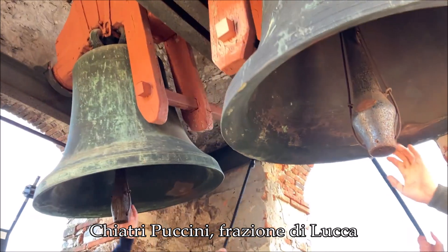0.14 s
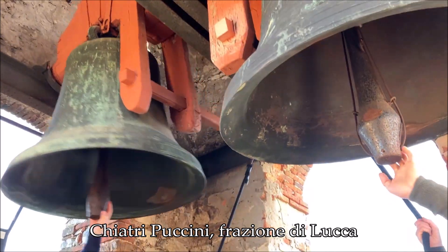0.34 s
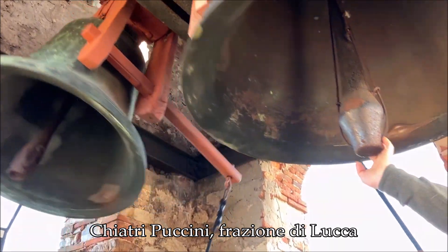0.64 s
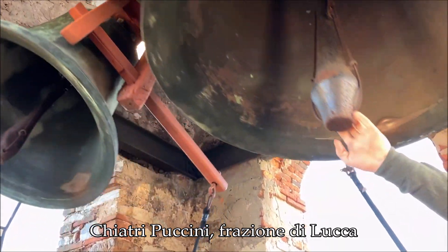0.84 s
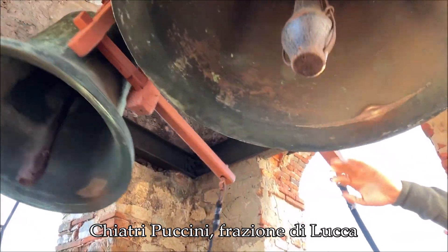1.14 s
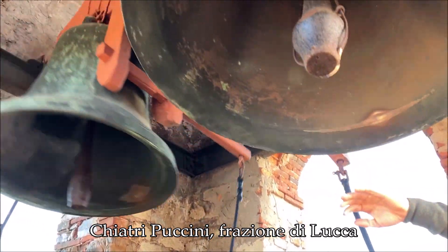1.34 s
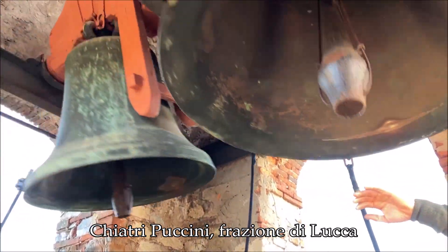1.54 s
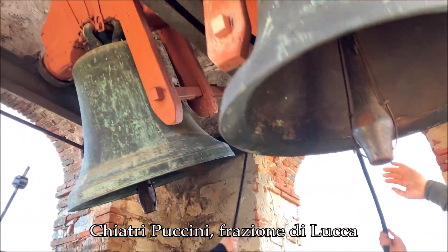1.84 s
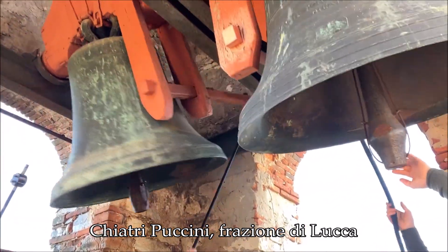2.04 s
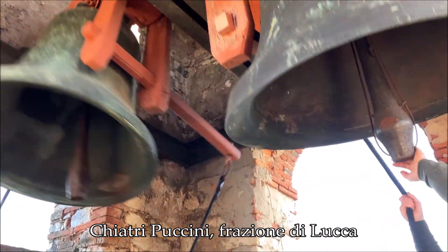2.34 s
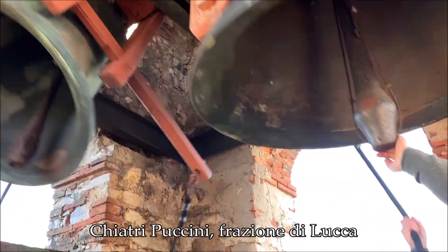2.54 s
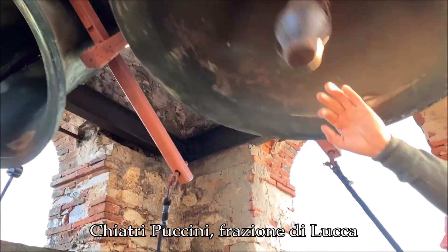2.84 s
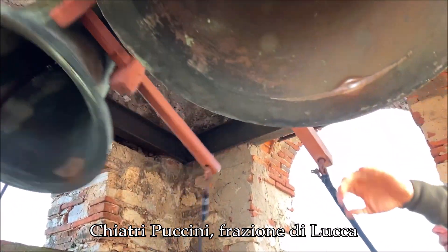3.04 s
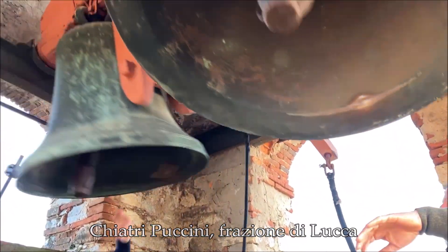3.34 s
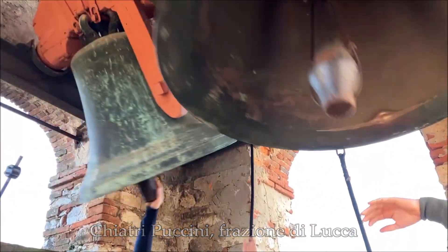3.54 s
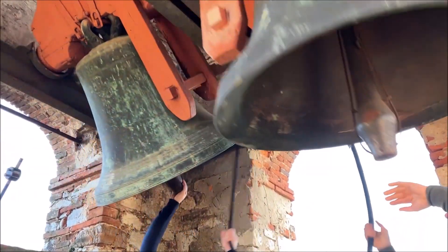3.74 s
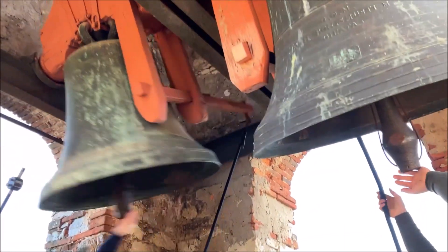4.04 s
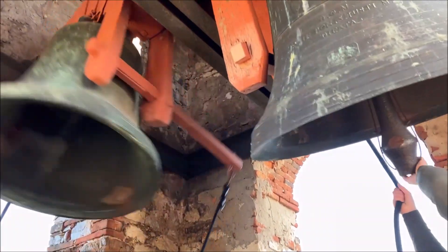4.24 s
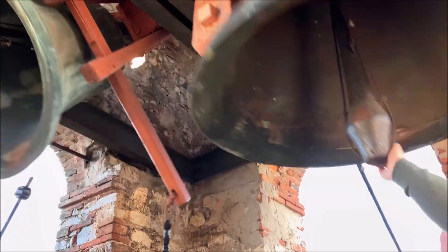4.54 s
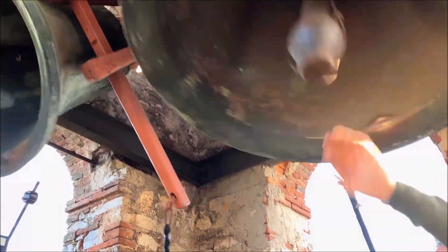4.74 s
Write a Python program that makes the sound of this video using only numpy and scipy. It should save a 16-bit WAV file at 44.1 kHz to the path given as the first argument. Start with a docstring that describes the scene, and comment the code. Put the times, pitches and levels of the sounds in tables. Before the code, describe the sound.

Heavy bells swing by hand in an open brick belfry, but no clapper strikes; only their mountings sound. Faint iron ticks and short low timber groans open the first 0.4 s, then firmer wooden knocks at 0.5-0.6 s. A hard, bright iron crack lands at 0.84 s, the sharpest blow. Sparse clacks follow at 1.25 and 1.9 s. From 2.2 to 2.5 s knocks cluster with groaning wood, a strong clack at 2.4 s and dull thuds. Around 3 s it is quieter, with a very faint bearing creak. A short high squeak comes at 3.4 s, then low frame thuds near 3.6 s. Rattling thickens from 3.7 to 4.3 s with creaks and thuds, then thins to small knocks, a groan and a last thud near 4.8 s. Blows leave a barely audible bronze hum and short reflections. Soft rustle, low wind bumps and faint outdoor murmur continue beneath, in close stereo.

```python
"""Headstock timbers and iron fittings knock and rattle close by, as heavy bells are set swinging by hand in an
open brick belfry, clappers held silent: chattering impacts ring iron, timber and bronze modes.
Timber groans, a bearing creaks and high squeaks sound by stick-slip; decaying sines thud in the frame.
Shaped noise makes a background rustle, the hiss of contact at each hard blow,
a light wind that bumps the microphone, and the murmur of the open air."""
import sys
import numpy as np
from scipy import signal
from scipy.fft import rfft, irfft, next_fast_len
from scipy.io import wavfile
from scipy.ndimage import uniform_filter1d

SR = 44100
rng = np.random.default_rng(int(sys.argv[2]) if len(sys.argv) > 2 else 0)


def gain_from_db(level_db):
    """Convert decibel levels to linear amplitude factors (20 dB per decade)."""
    decades = np.asarray(level_db, float) / 20
    return 10 ** decades


def int16_out(signal):
    """Quantize to a 16-bit WAV file."""
    q = np.round(np.clip(np.atleast_2d(signal).T, -1, 1) * 32767)
    wavfile.write(sys.argv[1], SR, q.astype(np.int16))


N = 215119

# Knocks of the fittings. Each row: time in seconds, iron level in dB before the gain for a long chatter,
# timber over iron in dB, hardness as the pitch in Hz where the treble starts to fall,
# chatter in seconds (held to 0.05), boost of the iron strap's ring in dB.
KNOCKS = [(.081, -50.5, -23, 1480, 0.045, -2), (.118, -43.5, -0.5, 6160, 0.019, 17),
          (0.194, -50.5, 0, 7060, 0.015, 21), (.274, -55, 11.5, 910, 0.0079, 10),
          (.49, -36, 4, 3870, 0.0097, 10), (.52, -50, 4.5, 2070, 0.031, -5),
          (.579, -34, 2.5, 2900, 0.0096, -4), (.609, -44, 2, 2530, .021, 23),
          (.76, -49, -0.5, 8400, 0.0057, -10), (.841, -19, -18, 8000, 0.024, -11),
          (.898, -36.5, -12.5, 6460, 0.014, 1), (1.17, -46.5, -6.5, 2020, 0.016, 3),
          (1.251, -31.5, -11, 4170, 0.02, 5.5), (1.291, -50.5, -20, 4970, .028, -9),
          (1.348, -47, -23, 8900, 0.018, -11), (1.551, -55.5, 6, 7000, 0.012, -11),
          (1.874, -39.5, -3, 2920, 0.012, 16), (2.17, -40.5, .5, 1150, 0.0094, 34),
          (2.242, -30, -12, 4500, 0.0074, 23.5), (2.27, -47, 10, 1170, 0.036, 21),
          (2.4, -23, 3, 5100, 0.0045, -18), (2.439, -46, 12, 2520, 0.012, 19),
          (2.482, -43, 6, 4960, 0.015, 9), (3.087, -47, 5.5, 7000, 0.0069, -4),
          (3.148, -56, 7.5, 2970, 0.0058, 0), (3.392, -43, 1, 7550, 0.02, -1),
          (3.709, -30.5, -13, 4330, 0.011, -11), (3.74, -40.5, -2, 4600, 0.017, 10),
          (3.818, -34, 5, 3020, 0.025, 12), (3.833, -29, 2, 5950, 0.014, 14),
          (3.938, -52, -15, 1490, 0.01, 12), (3.963, -34, -10, 1830, 0.0054, 23),
          (4.1, -39.5, 2.5, 3000, 0.018, 28), (4.168, -29, -9, 6000, 0.0074, 10),
          (4.208, -25, 5, 6130, 0.0091, 12.5), (4.24, -42, 4.5, 4020, 0.01, 14),
          (4.287, -30, 0.5, 6140, 0.0084, 7), (4.503, -49, -14, 7300, 0.021, 6),
          (4.626, -48.5, 0, 1970, 0.061, -7), (4.678, -37, 4, 4200, 0.013, -3),
          (4.704, -48.5, 9.5, 3000, 0.03, 8)]
# Modes of the headstock timber, before detuning. Each row: pitch in Hz, level in dB, 60 dB decay in seconds.
TIMBER = [(104, -12, 0.21), (200, -32, 0.21), (277, 3.5, 0.068), (362.5, 3.5, 0.093), (412.8, 7.5, 0.058),
          (540, -7.5, 0.047), (659, -5, 0.084)]
# Modes of the iron fittings, before detuning. Each row: pitch in Hz, level in dB,
# 60 dB decay in seconds (at least 0.004 is used).
IRON = [(837, -15, 0.064), (1083, -11, 0.04), (1422, -13, 0.046), (1676, 0.5, 0.0052), (1976, 0.5, 0.0098),
        (2330, -13, 0.01), (2633, -7, 0.012), (3303, 1, 0.0033), (4230, 0, 0.0037), (4500, -5, 0.01),
        (5320, -2, 0.011), (6430, 2, 0.0024), (7160, -1.5, 0.0025), (9100, 16.5, 0.0017),
        (11650, 6.5, 0.0052)]
# Faint hum of the bells after a knock. Each row: pitch in Hz, level in dB, 60 dB decay in seconds.
BRONZE = [(985, -33, .4), (1310, -39, .7), (1355, -34, .35), (1530, -38, .5), (1850, -40, .5),
          (2680, -39, .25)]
# Groans of loaded timber. Each row: start in seconds, length in seconds, level in dB,
# resonance at the start in Hz, resonance at the end in Hz.
GROANS = [(0.121, 0.111, -53, 362, 316), (0.271, 0.038, -46.5, 355, 352), (.298, 0.075, -50, 367, 350),
          (2.166, 0.071, -47.5, 350, 376), (2.241, 0.027, -40.5, 440, 410), (2.283, .11, -44.5, 338, 330),
          (2.97, 0.14, -62, 442, 434), (3.036, 0.12, -56.5, 303, 325), (3.845, .07, -40.5, 255, 250),
          (4.21, 0.057, -40.5, 337, 335), (4.697, 0.085, -42, 263, 274), (4.793, 0.12, -60, 293, 290)]
# Creaks of a bearing. Each row: start in seconds, length in seconds, level in dB,
# resonance at the start in Hz, resonance at the end in Hz.
CREAKS = [(2.89, 0.32, -67, 1055, 1190), (3.935, 0.038, -47.5, 787, 782), (3.966, 0.054, -46.5, 793, 800)]
# Squeaks: the bearing creak's high overtone near 2.3 kHz, and a pin's squeak near 5.1 kHz.
# Each row: start in seconds, length in seconds, level in dB,
# resonance at the start in Hz, resonance at the end in Hz.
SQUEAKS = [(2.964, 0.12, -57.5, 2330, 2310), (3.392, 0.084, -44.5, 5100, 5060)]
# Dull thuds through floor and frame. Each row: time in seconds, level in dB, pitch in Hz,
# 60 dB decay in seconds (held to 0.3).
THUDS = [(0.241, -36.5, 53.4, 0.055), (0.538, -43.5, 106, 0.15), (0.661, -44, 192, 0.14),
         (2.268, -44, 107, 0.087), (2.429, -32, 89, 0.089), (2.499, -31.5, 114, 0.073),
         (3.16, -36, 56.6, 0.087), (3.54, -31.5, 119, 0.061), (3.559, -32.5, 115.6, 0.14),
         (3.586, -27.5, 48, 0.21), (3.605, -36, 146, 0.12), (3.641, -39, 109, .12), (3.769, -39, 83, 0.34),
         (3.967, -30, 78, 0.041), (4.04, -36, 46, 0.18), (4.089, -27.5, 78.2, 0.17),
         (4.123, -33, 93, 0.038), (4.163, -34.5, 90, 0.1), (4.767, -33, 88, 0.17)]
# Reverberation of the brick belfry. Each row: pitch in Hz, 60 dB decay in seconds.
BELFRY = [(200, 0.21), (600, 0.34), (1500, 0.32), (4000, 0.21), (10000, 0.23)]
# Background rustle over time. Each row: time in seconds, level in dB.
RUSTLE = [(0.0, -96), (.16, -57.5), (.3, -87), (.46, -69.5), (.75, -78), (1.02, -86), (1.3, -65),
          (1.58, -69), (1.74, -79), (1.82, -70.5), (2.08, -74.5), (2.75, -70.5), (3.4, -73), (3.8, -73.5),
          (4.1, -61.5), (4.38, -82), (4.46, -62), (4.6, -73), (4.68, -63), (4.88, -62)]
# Spectrum of rustle and contact hiss. Each row: pitch in Hz, relative density in dB per Hz.
RUSTLE_COLOUR = [(60, -37), (300, -24), (1000, -5), (2500, 12), (5000, 6), (8000, 7.5), (12000, -1),
                 (22000, -61)]
# Wind on the microphone over time. Each row: time in seconds, level in dB.
WIND = [(0.0, -66), (0.12, -57), (0.5, -68), (0.71, -48.5), (0.8, -60), (1.37, -54), (1.83, -59.5),
        (2.44, -50.5), (2.74, -58.5), (2.97, -54), (3.56, -51.5), (3.69, -49), (3.88, -50.5), (4.09, -43),
        (4.29, -51), (4.62, -45.5), (4.74, -61), (4.88, -43)]
# Spectrum of the wind. Each row: pitch in Hz, relative density in dB per Hz.
WIND_COLOUR = [(15, -68), (30, -18), (50, -2), (90, -1.5), (150, -13.5), (300, -16), (700, -27.5),
               (2000, -64)]
# Spectrum of the open air. Each row: pitch in Hz, relative density in dB per Hz.
AIR_COLOUR = [(20, -36), (60, -33), (100, 8), (300, -11), (1000, -17), (2500, -23.5), (6000, -31),
              (12000, -30), (22000, -101)]
# Stereo likeness by pitch: bass alike, middle apart, treble swinging between in step and opposed.
# Each row: pitch in Hz, likeness from -1 (opposed) to 1 (in step).
STEREO_LIKENESS = [(60, .82), (200, .8), (350, .4), (900, .1), (2000, -.1), (3200, -.2), (4200, .2),
                   (5300, 0), (6300, .4), (6700, .995), (7400, .995), (7900, -.3), (8500, -.9995),
                   (9600, -.9995), (10000, 0), (10400, .998), (22000, .9995)]
# Overall colour: weak deep bass, and a steep edge near 12 kHz. Each row: pitch in Hz, gain in dB.
OVERALL_COLOUR = [(10, -35), (25, -14), (42, -3), (7800, 0.86), (9200, -2), (10600, 0), (11800, 1),
                  (12300, -56), (13000, -19), (22000, -50)]

KNOCK_PAN_DB, KNOCK_PAN_SPREAD_DB = 2.5, 2  # left minus right
STRAP_HZ, STRAP_HZ_PER_OCTAVE = 866, 61.7  # a harder blow rings the strap a little higher
# A blow away from the strap rings a bearing plate: the plate loses this share of the strap's dB.
PLATE_HZ, PLATE_DB, PLATE_TRADE = 2520, 3, 0.5
KNOCK_ECHO_DB, SLIP_ECHO_DB = 1, -2  # slips stir the belfry less than blows do
SLIP_RISE_S, SLIP_WAVER_HZ = 0.0044, 14  # swell; rms wobble of the pitch
BREAK_FREE = 2.6  # size of a fixed early jerk; the spread of the others is 1
# Bright hiss of contact at a blow, the louder the harder it is.
HISS_DB, HISS_DB_PER_OCTAVE, HARD_HZ = -12.5, 20.5, 8000
HISS_RISE_S, HISS_FADE_DB_PER_S = 0.0071, 423
AIR_DB = -59


def evened(x):
    """Scales to rms 1."""
    return x / np.sqrt(np.mean(x ** 2) + 1e-20)


def read(points, hz):
    """Reads a table on a log-frequency axis."""
    f, value = np.transpose(points)
    return np.interp(np.log(hz + 1), np.log(f + 1), value)


def add(mix, s, sound):
    """Mixes a two-channel sound in at time s."""
    part = mix[:, max(round(s * SR), 0):][:, :sound.shape[1]]
    part += sound[:, :part.shape[1]]


def ring(modes, size, spread):
    """Impulse response of an object: decaying sines, each tuned a little differently on every call."""
    hz, db, t60 = np.transpose(modes)
    hz = hz * (1 + spread * rng.standard_normal(len(hz)))
    t = np.arange(size)[:, None] / SR
    decay = gain_from_db(db - 60 * t / np.clip(t60, 0.004, 2))
    return (decay * np.sin(2 * np.pi * hz * t)).sum(1)


def iron_fittings(impacts, bronze, top_hz, strap_db):
    """Tiny impacts ring iron and bronze; strap and plate stand out, and soft contact dulls the treble."""
    body = bronze.copy()
    body[:1024] += ring(IRON, size=1024, spread=0.038)
    body[0] += 7  # the bare crack of contact
    iron = signal.fftconvolve(impacts, body)
    strap_hz = STRAP_HZ + STRAP_HZ_PER_OCTAVE * np.log2(top_hz / 3000)
    iron += gain_from_db(strap_db) * signal.lfilter(*signal.iirpeak(strap_hz, 12, SR), iron)
    plate_hz = PLATE_HZ * (1 + 0.042 * rng.standard_normal())
    plate = signal.lfilter(*signal.iirpeak(plate_hz, 9, SR), iron)
    iron += gain_from_db(PLATE_DB - PLATE_TRADE * strap_db) * plate
    soft = signal.butter(4, top_hz, fs=SR, output="sos")
    iron = signal.sosfilt(soft, iron) + gain_from_db(-28.5) * iron  # a little treble still gets past
    iron = signal.lfilter(*signal.butter(2, 500, "high", fs=SR), iron)
    return iron / np.linalg.norm(iron)


def headstock_timber(push):
    """A slow, uneven push rings the low modes of the timber."""
    timber = signal.fftconvolve(push, ring(TIMBER, size=4096, spread=0.061))
    return timber / np.linalg.norm(timber)


def knock(bronze, iron_db, timber_db, top_hz, chatter_s, strap_db):
    """Loose parts meet in a quick chatter of tiny impacts; iron answers at once, timber takes a slower push."""
    t = np.arange(4096) / SR
    strength, chance, push_strength = rng.standard_normal((3, len(t)))
    pan_db = KNOCK_PAN_DB + KNOCK_PAN_SPREAD_DB * rng.standard_normal()
    chatter_s = np.clip(chatter_s, 0.002, 0.05)
    swell = np.minimum(t / (0.45 * chatter_s), 1) * np.exp(-(t / chatter_s) ** 2)
    impacts = swell * strength * (abs(chance) > 1.15)
    sound = iron_fittings(impacts, bronze, top_hz, strap_db)
    push_shape = np.minimum(t / 0.0096, 1) * np.exp(-t / (chatter_s + 0.022))
    timber = headstock_timber(push_shape * push_strength * (abs(chance) > 2))
    sound[:len(timber)] += gain_from_db(timber_db) * timber
    level = gain_from_db(iron_db) * np.sqrt(chatter_s * SR / 10)  # a longer chatter carries more energy
    return level * belfry(sound, KNOCK_ECHO_DB) * gain_from_db([[pan_db / 2], [-pan_db / 2]])


def resonate(x, hz, width):
    """A moving resonance of gain 1: shift down, smooth, shift back."""
    turn = np.exp(2j * np.pi * np.cumsum(hz) / SR)
    r = np.exp(-np.pi * width / SR)
    return 2 * (turn * signal.lfilter([1 - r], [1, -r], x / turn)).real


def slip(length, level_db, from_hz, to_hz, slips_per_s, width_hz, overtone, overtone_db, loss_db):
    """Uneven stick-slip jerks ring a resonance and a weaker one above it; a quick swell, then a fade."""
    u = np.arange(0, length, 1 / SR) / length
    wobble = evened(uniform_filter1d(rng.standard_normal(len(u)), size=700))
    hz = from_hz + (to_hz - from_hz) * u + SLIP_WAVER_HZ * wobble
    jerks = (rng.random(len(u)) < slips_per_s / SR) * rng.standard_normal(len(u))
    jerks[100] = BREAK_FREE
    low = evened(resonate(resonate(jerks, hz, width_hz), hz, 3 * width_hz))
    high = evened(resonate(jerks, overtone * hz, 2.1 * width_hz))
    swell = np.minimum(u * length / SLIP_RISE_S, 1)
    release = np.minimum((1 - u) * 10, 1)
    shape = swell * gain_from_db(level_db + loss_db * u) * release
    return belfry(shape * (low + gain_from_db(overtone_db) * high), SLIP_ECHO_DB)


def groan(*row):
    """Loaded timber slips unevenly and rings a low, narrow resonance."""
    return slip(*row, slips_per_s=300, width_hz=45, overtone=2.3, overtone_db=-16, loss_db=-10.4)


def creak(*row):
    """A bearing slips as unevenly as the timber, with a broader resonance that fades less."""
    return slip(*row, slips_per_s=300, width_hz=60, overtone=2.05, overtone_db=-20, loss_db=-7.8)


def squeak(*row):
    """A creak's high overtone or a pin's squeak: dense jerks in a broad, high resonance that fades quickly."""
    return slip(*row, slips_per_s=1300, width_hz=130, overtone=2.02, overtone_db=-18, loss_db=-27.3)


def thud(db, hz, t60):
    """A soft low push rocks the frame for a few cycles, with a quicker shudder on top."""
    t = np.arange(SR // 4) / SR
    shudder_hz = hz * rng.uniform(1.46, 2.79)
    shudder = 0.51 * np.sin(2 * np.pi * shudder_hz * t) * gain_from_db(-30 * t / 0.049)
    rock = (np.sin(2 * np.pi * hz * t) + shudder) * np.minimum(t * hz / 0.41, 1)
    return rock * gain_from_db(db - 60 * t / np.clip(t60, 0.02, 0.3)) * np.array([[1], [0.85]])


def belfry(x, echo_db):
    """Direct sound plus sparse reflections off brick and bronze, other ones for each side."""
    at = np.arange(60, SR // 3 - 20, 20)
    at = at + rng.integers(0, 20, (2, len(at)))
    taps = np.zeros((2, SR // 3))
    np.put_along_axis(taps, at, rng.choice([-1.0, 1.0], at.shape), 1)
    hz, t, z = signal.stft(taps, SR, nperseg=256)
    decay = gain_from_db(-60 * t / np.clip(read(BELFRY, hz), 0.05, 2)[:, None])
    tail = signal.istft(z * decay, SR, nperseg=256)[1]
    tail *= gain_from_db(echo_db) / np.linalg.norm(tail[0])
    tail[1, 0] += 1
    tail[0, 4] += 1  # the direct sound reaches the left side a little later
    return signal.fftconvolve(x[None], tail, axes=1)


def hush(colour, size, patchy_db, flicker_db):
    """Random short-time spectra with patches and a flicker across all pitches, unrelated left and right."""
    hop = size // 4
    frames, hz = N // hop + 5, np.fft.rfftfreq(size, 1 / SR)
    draw = rng.standard_normal((5, len(hz), frames))
    patches = uniform_filter1d(draw[4], size // 64, axis=0)  # across pitch
    patches = evened(uniform_filter1d(patches, 6, axis=1))  # across time
    flicker = evened(uniform_filter1d(rng.standard_normal(frames), 3))
    db = read(colour, hz)[:, None] + patchy_db * patches + flicker_db * flicker
    z = (draw[:2] + 1j * draw[2:4]) * gain_from_db(db)
    return evened(signal.istft(z, nperseg=size, noverlap=size - hop)[1][:, :N])


def rustle_and_contact_hiss(t):
    """Bright hiss of contact at each hard blow, over a background rustle: one noise, their powers summed."""
    power = gain_from_db(np.interp(t, *np.transpose(RUSTLE))) ** 2
    for s, iron_db, _, top_hz, _, _ in KNOCKS:
        after = np.clip(t - s, 0, None)
        db = iron_db + HISS_DB + HISS_DB_PER_OCTAVE * np.log2(top_hz / HARD_HZ)
        fade = gain_from_db(db - HISS_FADE_DB_PER_S * np.minimum(after, 0.5))
        power = power + (np.minimum(after / HISS_RISE_S, 1) * fade) ** 2
    return np.sqrt(power) * hush(RUSTLE_COLOUR, size=512, patchy_db=2, flicker_db=2.5)


def wind(t):
    """A light wind bumps the microphone: low noise that swells and sinks."""
    return gain_from_db(np.interp(t, *np.transpose(WIND))) * hush(WIND_COLOUR, size=2048, patchy_db=2.5, flicker_db=1)


def open_air():
    """The murmur of the open air: faint noise, strongest in the bass."""
    return gain_from_db(AIR_DB) * hush(AIR_COLOUR, size=1024, patchy_db=2.0, flicker_db=1.13)


def scene():
    """Knocks, groans, creaks, squeaks and thuds in the belfry, over rustle, wind and open air."""
    t = np.arange(N) / SR
    mix = np.zeros((2, N))
    bronze = ring(BRONZE, size=12289, spread=0)
    for s, *blow in KNOCKS:
        add(mix, s - 0.003, knock(bronze, *blow))  # the chatter begins just ahead of the listed time
    for voice, rows in [(groan, GROANS), (creak, CREAKS), (squeak, SQUEAKS)]:
        for s, *row in rows:
            add(mix, s, voice(*row))
    for s, *push in THUDS:
        add(mix, s - 0.005, thud(*push))  # likewise the push
    return mix + rustle_and_contact_hiss(t) + wind(t) + open_air()


def roll_off(x):
    """The treble ends steeply here."""
    return signal.sosfilt(signal.butter(12, 12860, fs=SR, output="sos"), x)


def record(dry):
    """Stereo likeness by pitch, from mid and side levels, and the overall colour."""
    size = next_fast_len(N)
    hz = np.fft.rfftfreq(size, 1 / SR)
    likeness = read(STEREO_LIKENESS, hz)
    left, right = rfft(dry, size) * gain_from_db(read(OVERALL_COLOUR, hz))
    mid = (left + right) / 2 * np.sqrt(1 + likeness)
    side = (left - right) / 2 * np.sqrt(1 - likeness)
    mix = irfft([mid + side, mid - side], size)[:, :N]
    return roll_off(mix)


dry = scene()
out = record(dry)
int16_out(out)
```